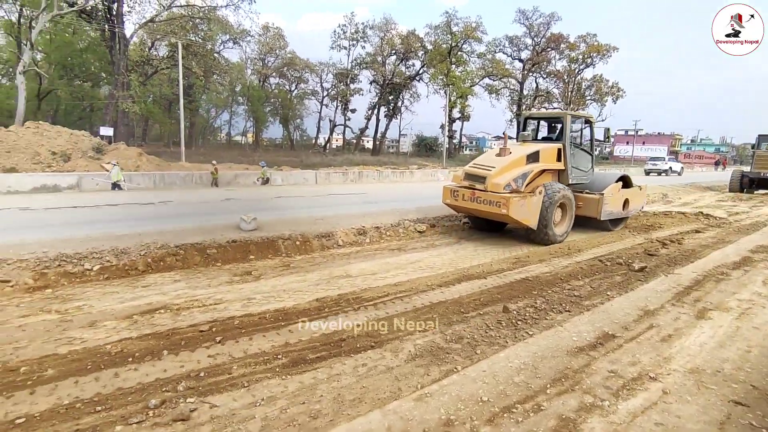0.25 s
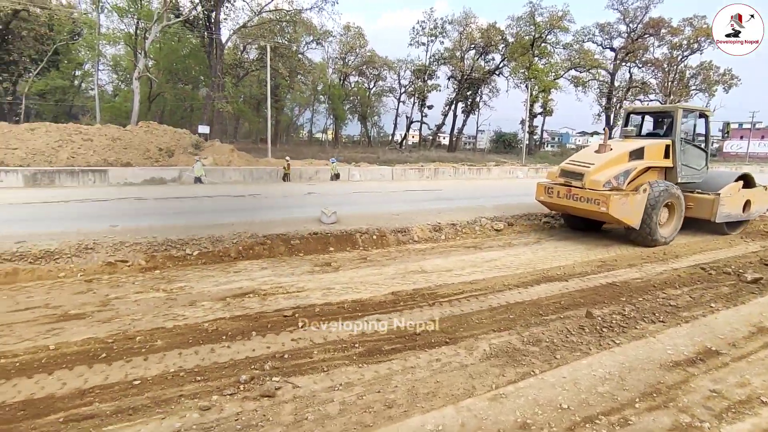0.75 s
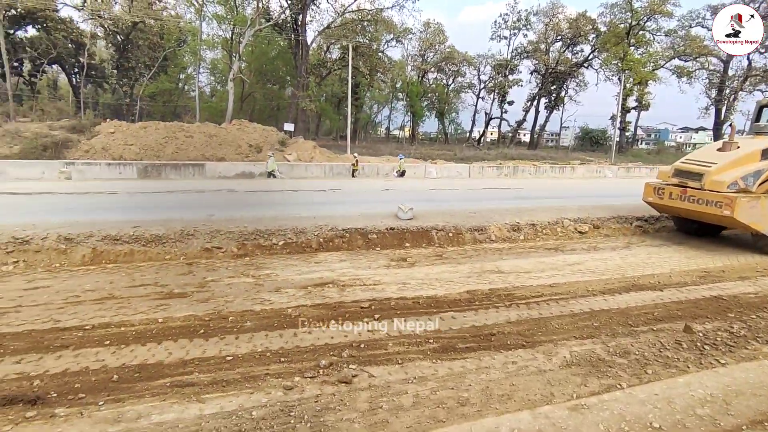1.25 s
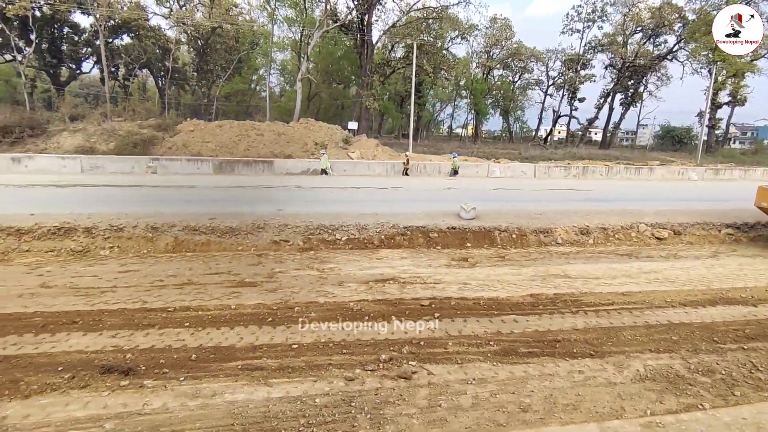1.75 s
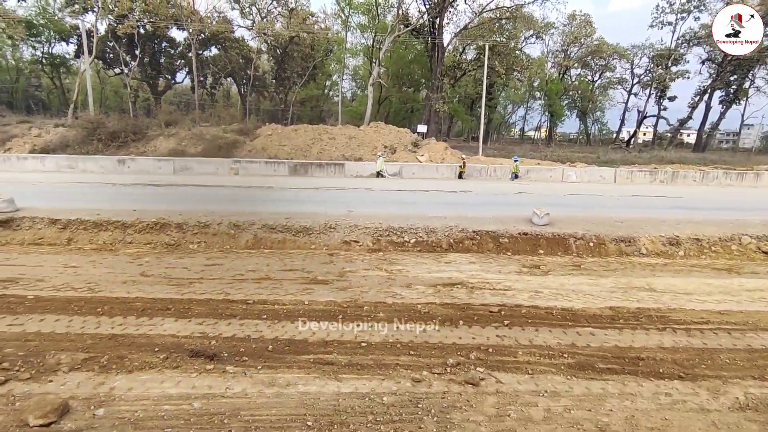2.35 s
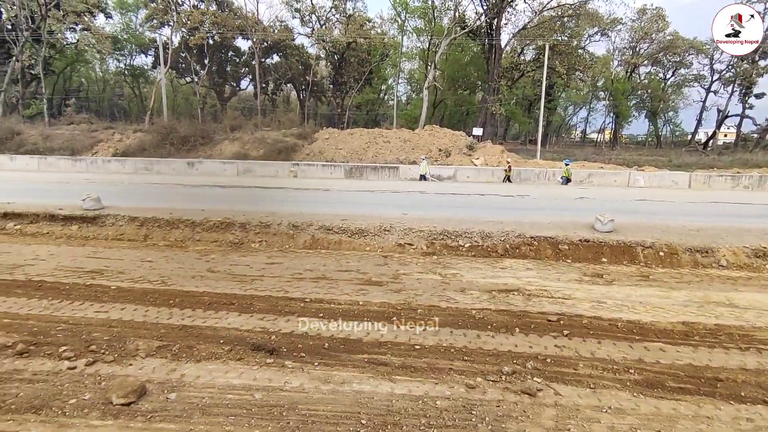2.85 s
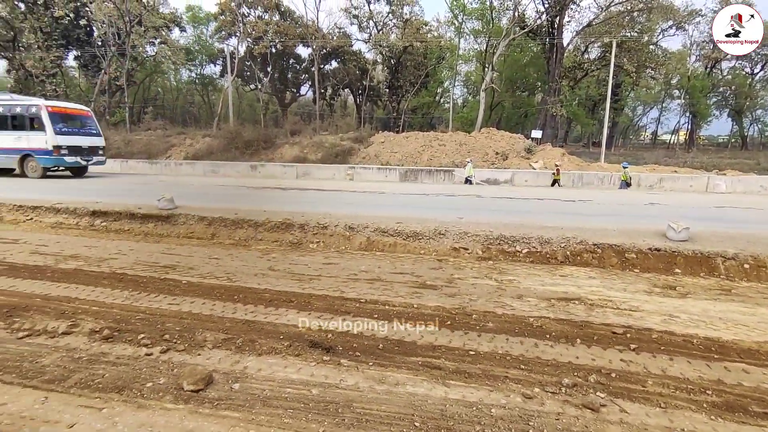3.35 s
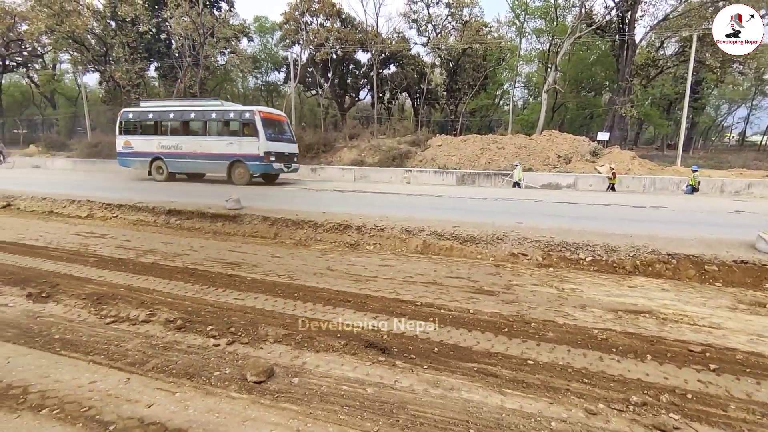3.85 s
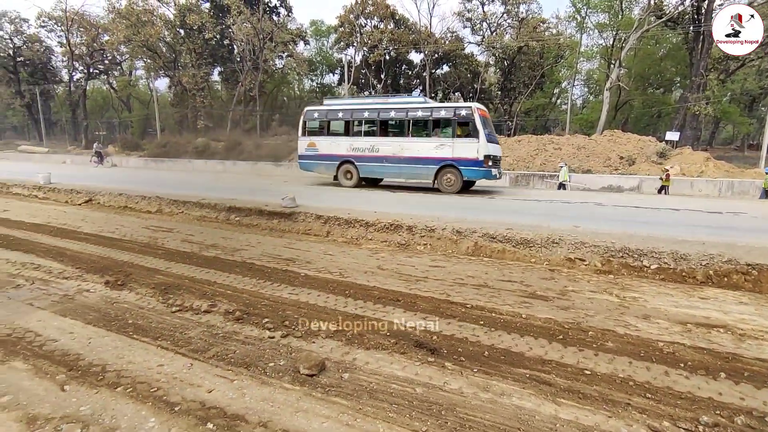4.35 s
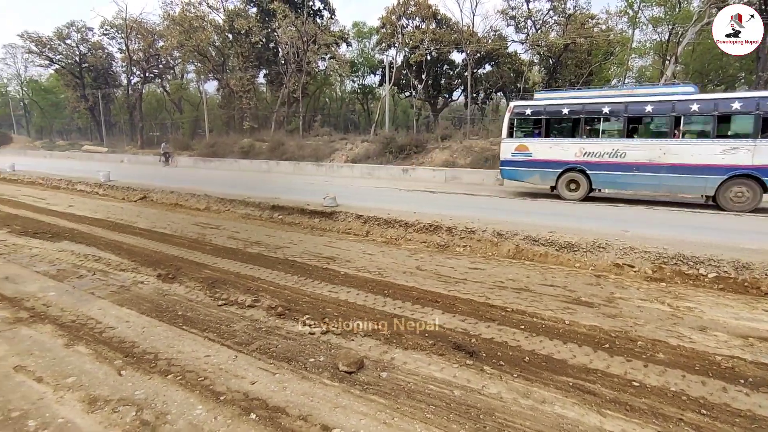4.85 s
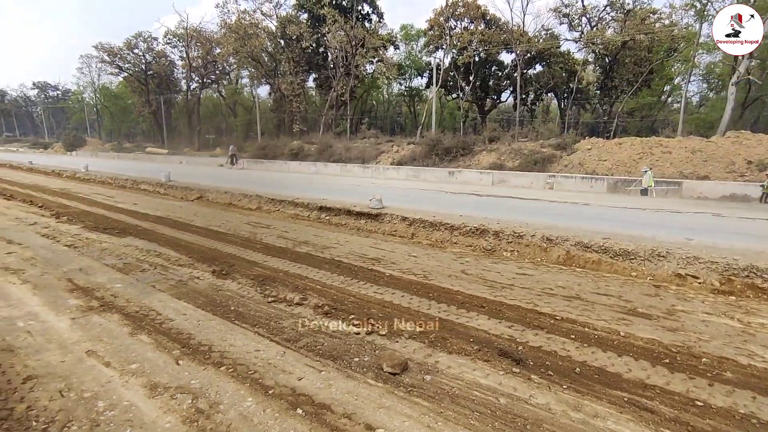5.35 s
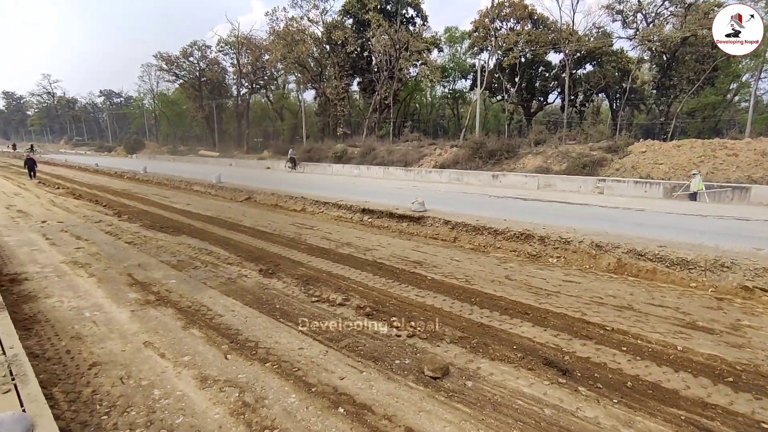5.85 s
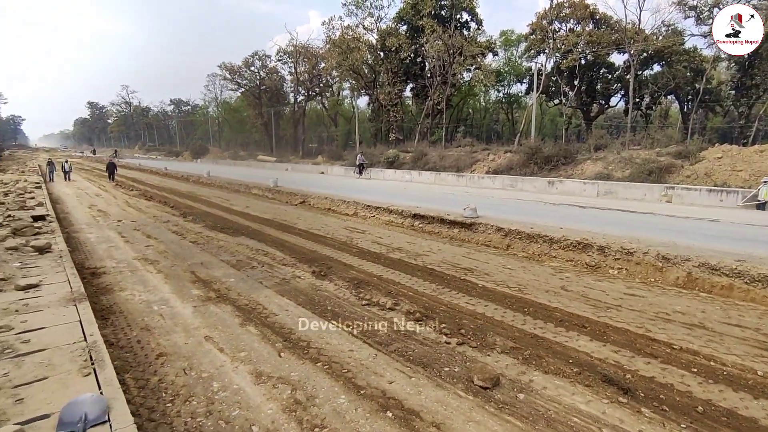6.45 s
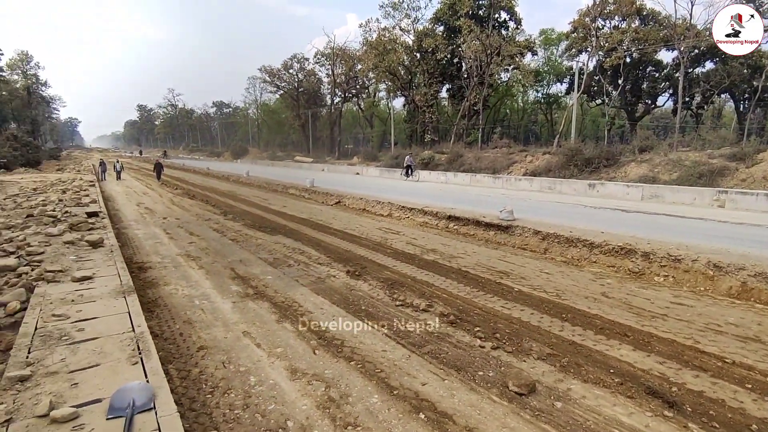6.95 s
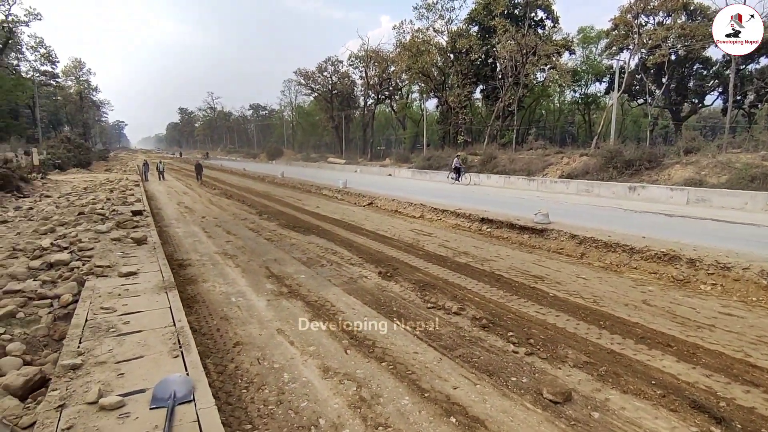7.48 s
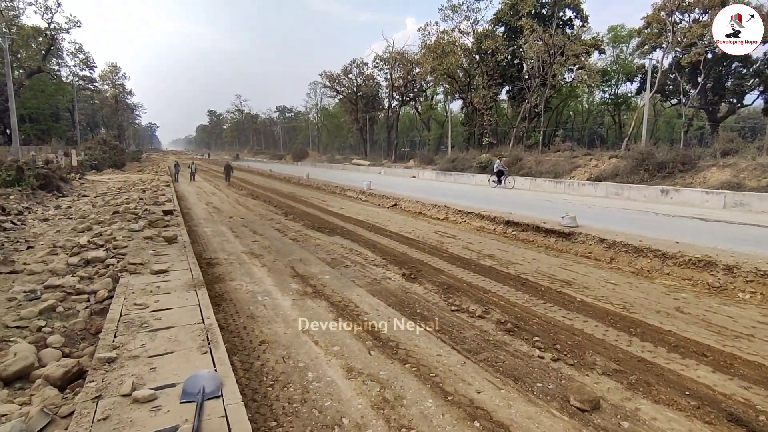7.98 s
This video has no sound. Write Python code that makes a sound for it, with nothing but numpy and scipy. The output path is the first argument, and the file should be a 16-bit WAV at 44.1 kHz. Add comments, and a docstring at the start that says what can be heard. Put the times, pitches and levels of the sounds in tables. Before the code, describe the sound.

A diesel road roller drones and fades, then a bus passes with a swelling exhaust boom over low roadside rumble.

```python
"""A six-cylinder diesel road roller works a gravel bed: exhaust note, pump whine, fan roar, clatter, hiss.
Its eccentric drum shakes the ground until switched off. A bus passes with a swelling exhaust boom
and tyre rush, over a low roadside rumble and far traffic. The microphone pans away from the roller;
its two ports are summed, so notches sweep through roller and bus as their bearings change."""
import sys
import numpy as np
from scipy.fft import rfft, irfft, next_fast_len
from scipy.io import wavfile
from scipy.ndimage import map_coordinates

SR = 44100
rng = np.random.default_rng(int(sys.argv[2]) if len(sys.argv) > 2 else 0)


def store_pcm(level_fs):
    """Save levels as 16-bit WAV."""
    pcm = np.round(np.clip(level_fs, -1, 1) * 32767).astype(np.int16)
    wavfile.write(sys.argv[1], SR, np.atleast_2d(pcm).T)


N = 362502

PORT_MS = 0.494  # lag between the ports, sound from the side


def amp(db):
    """Decibels to gain."""
    return 10 ** (np.asarray(db) / 20)


def unit(x):
    """x scaled to rms 1."""
    return x / np.sqrt(np.mean(x ** 2) + 1e-20)


def curves(rows):
    """One value per sample for each column after the time."""
    s, *cols = np.transpose(rows)
    return [np.interp(np.arange(N) / SR, s, c) for c in cols]


def wobble(rate):
    """A smooth random curve, rate knots a second."""
    return map_coordinates(rng.standard_normal(int(N * rate / SR) + 4), [np.arange(N) * rate / SR])


def filtered(x, response):
    """x times a response of frequency."""
    m = next_fast_len(N + SR // 2)
    return irfft(rfft(x, m) * response(np.fft.rfftfreq(m, 1 / SR)), m)[:N]


def coloured(x, spectrum):
    """x shaped by (Hz, dB) points on a log axis, at rms 1."""
    f, db = np.transpose(spectrum)
    return unit(filtered(x, lambda hz: amp(np.interp(np.log(hz + 1), np.log(f), db))))


def noise(spectrum):
    """Coloured noise of rms 1."""
    return coloured(rng.standard_normal(N), spectrum)


def tone(turns, waver_db, drift):
    """A line of rms 1 whose level and phase waver in the moving air."""
    phase = 2 * np.pi * (turns + rng.random()) + drift * wobble(5.5)
    return unit(amp(waver_db * wobble(6.6)) * np.sin(phase))


def ports(x, lag_ms, far_share, shadow_hz=10000):
    """Sum of the two ports: the far one hears x later, its treble shadowed by the camera body."""
    shadowed = filtered(x, lambda hz: far_share / (1 + (hz / shadow_hz) ** 2))
    return (x + delayed(shadowed, lag_ms)) / np.sqrt(1 + far_share ** 2)


def delayed(x, lag_ms):
    """x arriving lag_ms later."""
    return map_coordinates(x, [np.arange(N) - np.abs(lag_ms) * SR / 1000], order=3, mode="mirror")


def seconds():
    """The time of every sample."""
    return np.arange(N) / SR


def step(x, middle, edge):
    """A soft step from 0 to 1 as x passes middle."""
    return .5 + .5 * np.tanh((x - middle) / (2 * edge))


def band(centre_hz, width_hz):
    """Narrow noise of rms 1 around a steady or moving centre."""
    phase = 2 * np.pi * np.cumsum(np.full(N, centre_hz)) / SR
    return unit(wobble(width_hz) * np.cos(phase) + wobble(width_hz) * np.sin(phase))


def swell(peak_s, hold_s, db, rise_db_per_s, fall_db_per_s):
    """Gain that rises until peak_s and falls from peak_s + hold_s."""
    t = seconds() - peak_s
    return amp(db - rise_db_per_s * np.maximum(-t, 0) - fall_db_per_s * np.maximum(t - hold_s, 0))


def gush(peak_s, hold_s, db, rise_db_per_s, fall_db_per_s, centre_hz, glide_hz_per_s, width_hz):
    """Swell of narrow noise, gliding in pitch around its peak."""
    hz = centre_hz + glide_hz_per_s * np.clip(seconds() - peak_s, -.5, 1)
    return swell(peak_s, hold_s, db, rise_db_per_s, fall_db_per_s) * band(hz, width_hz)


def exhaust_and_pump(cycles, trim_db=-4):
    """Exhaust harmonics of the four-stroke cycle and steady hydraulic whine, on one envelope."""
    # t/s, level/dB before trim
    exhaust_envelope = [(0, -23.5), (1.4, -22), (3.6, -22.5), (4.8, -32.5), (8.22, -34.5)]
    # multiple of cycle rate, relative level/dB
    exhaust_lines = [(6, 3.5), (12, -7), (18, -13), (40, -17), (46, -19), (47, -17.5)]
    # f/Hz, relative level/dB
    pump_lines = [(261.5, -4.5), (449.5, -9), (514, -11.5)]
    level_db, = curves(exhaust_envelope)
    exhaust = sum(amp(db) * tone(k * cycles, waver_db=1, drift=0.05) for k, db in exhaust_lines)
    pump = sum(amp(db) * tone(hz * seconds(), waver_db=3.5, drift=0.96) for hz, db in pump_lines)
    return amp(level_db + trim_db) * (exhaust + pump)


def block_tones(cycles):
    """The engine block sounds at high harmonics of the cycle."""
    # multiple of cycle rate, relative level/dB
    block_lines = [(53, -4.5), (54, -9.5), (58, -5), (59, -6.5), (66, -3), (68, -5), (70, -3), (72, -11.5),
                   (78, -8.5), (81, -13)]
    return sum(amp(db) * tone(k * cycles, waver_db=7, drift=0.8) for k, db in block_lines)


def throb(cycles, uneven_db, repeat_share):
    """White engine noise, partly repeating each cycle; the nearer cylinders knock louder."""
    size = int(1 / np.mean(np.gradient(cycles)))
    repeating = map_coordinates(rng.standard_normal(size), [cycles % 1 * size], order=1, mode="grid-wrap")
    rattle = np.sqrt(repeat_share) * unit(repeating) + np.sqrt(1 - repeat_share) * rng.standard_normal(N)
    return rattle * amp(uneven_db * np.cos(2 * np.pi * cycles))


def fan_roar(cycles):
    """Low fan noise with a flickering level."""
    # f/Hz, relative level/dB
    roar_spectrum = [(40, -52.5), (60, -7.5), (120, -8), (190, -7), (260, 0.5), (330, 0.5), (400, -1),
                     (510, -0.5), (570, -9), (720, -19), (1100, -46), (3000, -80)]
    flicker = amp(0.61 * wobble(14) + 1.4 * wobble(36))
    return flicker * coloured(throb(cycles, uneven_db=0.3, repeat_share=0.059), roar_spectrum)


def puffs(firings):
    """One pressure pulse per firing: most are weak, a few thump."""
    # f/Hz, relative level/dB
    puff_spectrum = [(60, -33.5), (110, -21), (170, -4.5), (270, 0.5), (400, -2.5), (470, -4), (560, -17),
                     (1000, -43.5)]
    fired = np.diff(np.floor(firings), prepend=0)
    return coloured(-fired * rng.random(N) ** 3, puff_spectrum)


def clatter(cycles, buzz_db=1.5):
    """Block clatter, buzzing at seven beats a cycle."""
    # f/Hz, relative level/dB
    clatter_spectrum = [(400, -42.5), (580, -5.5), (720, -3), (960, -4), (1200, -5.5), (1450, -11),
                        (1800, -12.5), (4000, -61.5)]
    buzz = amp(buzz_db * np.cos(2 * np.pi * 7 * cycles))
    return coloured(buzz * throb(cycles, uneven_db=0.5, repeat_share=0.25), clatter_spectrum)


def injector_rasp(cycles):
    """Bright injector noise, pulsing slightly once a cycle."""
    # f/Hz, relative level/dB
    rasp_spectrum = [(700, -25.5), (1100, -9), (1370, 4.5), (1700, 0.5), (2350, -1.5), (2750, -3.5),
                     (3400, -13), (5000, -22), (7500, -44.5)]
    return amp(0.4 * np.cos(2 * np.pi * cycles)) * noise(rasp_spectrum)


def bounced(x):
    """Direct sound plus a reflection off packed soil that fades as the roller comes close."""
    # t/s, lag/ms, reflection gain
    reflection = [(0, 0.93, 0.54), (0.55, 0.94, 0.47), (1.1, 1.02, 0.29), (1.7, 0.83, 0)]
    lag_ms, strength = curves(reflection)
    return (x + strength * delayed(x, lag_ms)) / np.sqrt(1 + strength ** 2)


def from_roller(x, bearing_deg):
    """x at the summed ports, from a bearing on the roller."""
    return ports(x, PORT_MS * np.sin(np.radians(bearing_deg)), far_share=0.6, shadow_hz=8500)


def hiss(bearing_deg):
    """Hiss from the roller's front, middle and rear; a wide span blurs their notches."""
    # f/Hz, relative level/dB
    hiss_spectrum = [(1500, -18.5), (2600, -3), (3400, 3), (4400, -0.5), (5200, 3.5), (6000, 0), (6700, 2),
                     (7400, 6.5), (8000, -22)]
    # t/s, half span/deg
    half_span = [(0, 3.2), (1.5, 8.4), (4, 4.6), (8.22, 0.98)]
    half_deg, = curves(half_span)
    parts = (from_roller(noise(hiss_spectrum), bearing_deg + side * half_deg) for side in (-1, 0, 1))
    return sum(parts) / np.sqrt(3)


def sizzle():
    """A narrow band of hiss stands out twice and slides in pitch."""
    # peak/s, hold/s, level/dB, rise/(dB/s), fall/(dB/s), f/Hz, glide/(Hz/s)
    sizzles = [(1.1, 0.4, -43, 23.5, 18.5, 6210, -700), (2.3, 0.27, -48.5, 16, 17, 6310, 601.5)]
    return sum(gush(*row, width_hz=750) for row in sizzles)


def roller():
    """The diesel's parts summed; levels and port lag shift as the microphone turns away."""
    # t/s, firing rate/Hz
    engine_speed = [(0, 102.7), (1, 102.7), (2.5, 102.8), (8.2, 102.1)]
    # t/s, bearing off axis/deg
    roller_bearing = [(0, 13.5), (.45, 20.6), (1.1, 38.5), (1.8, 55), (2.5, 68), (4.2, 95), (5.4, 113),
                      (6.2, 113), (7, 128), (8.22, 131)]
    firing_hz, = curves(engine_speed)
    bearing_deg, = curves(roller_bearing)
    turned = (1 - np.cos(np.radians(bearing_deg))) / 2  # 0 ahead, 1 behind
    screened = step(bearing_deg, 117.2, 0.87)  # engine bay screened behind the microphone
    roar_db = -18.5 - 13 * turned
    hood_db = -27 - 23 * turned
    clatter_db = -29.5 - 3.5 * turned - 16 * screened
    rasp_db = -34.5 - 7.5 * turned - 17.5 * screened
    firings = np.cumsum(firing_hz * (1 + 0.00083 * wobble(3.04))) / SR
    cycles = firings / 6
    lines = exhaust_and_pump(cycles)
    block = amp(-12) * block_tones(cycles)
    roar = amp(roar_db) * (fan_roar(cycles) + amp(-6) * puffs(firings))
    hood_resonance = amp(hood_db) * band(centre_hz=393, width_hz=42)
    knocking = amp(clatter_db) * (clatter(cycles) + block)
    flutter = amp(0.7 * wobble(16))  # moving air
    treble_gain = flutter * amp(2.5 * (1 - step(seconds(), 0.41, 0.025)))  # brighter at first
    rasp = amp(rasp_db) * treble_gain * injector_rasp(cycles)
    body = lines + hood_resonance + bounced(roar + knocking + rasp)
    hiss_db = -38.5 - 7.5 * turned + .25 * np.cos(2 * np.pi * firings)
    hissing = amp(hiss_db) * treble_gain * hiss(bearing_deg)
    return from_roller(body, bearing_deg) + hissing + flutter * sizzle()


def drum(spin_hz=30.43, stop_s=4.1, fall_db_per_s=55.5):
    """An eccentric weight shakes the ground at its spin rate and twice that, until switched off."""
    level_db = -37 - fall_db_per_s * np.maximum(seconds() - stop_s, 0)
    spin = spin_hz * seconds()
    shake = tone(spin, waver_db=1, drift=.08) + amp(-1) * tone(2 * spin, waver_db=2, drift=.4)
    return amp(level_db) * shake


def rumble():
    """Lumpy low roadside noise."""
    # t/s, level/dB
    rumble_envelope = [(0, -26), (1, -20.5), (3.5, -20.5), (4.5, -19), (6.3, -18.5), (7, -17.5),
                       (8.22, -19)]
    # f/Hz, relative level/dB
    rumble_spectrum = [(15, -58.5), (35, -38), (55, -9), (80, -5), (108, 0.5), (135, -2), (185, 1),
                       (245, -2.5), (295, -11.5), (400, -18), (700, -23.5), (2000, -56)]
    level_db, = curves(rumble_envelope)
    return amp(level_db) * unit(amp(0.36 * wobble(25)) * noise(rumble_spectrum))


def far_traffic(turn_s=6.1):
    """Distant traffic, louder once the microphone faces up the road."""
    # f/Hz, relative level/dB
    traffic_spectrum = [(200, -13.5), (450, -6), (800, -4.5), (1020, -16.5), (1250, -10), (1650, -13.5),
                        (2150, -21.5), (2600, -19), (3300, -25.5), (4200, -35.5), (5200, -21), (6500, -38),
                        (7500, -34.5)]
    level_db = -41.5 + 9 * step(seconds(), turn_s, 0.33)
    return amp(level_db + 0.51 * wobble(10)) * noise(traffic_spectrum)


def bus_exhaust(firings):
    """Low gushes, and a boom that peaks when the tailpipe faces the microphone."""
    # peak/s, hold/s, level/dB, rise/(dB/s), fall/(dB/s)
    boom_swell = (5, -0.07, -17, 6, 13.5)
    # peak/s, hold/s, level/dB, rise/(dB/s), fall/(dB/s), f/Hz, glide/(Hz/s)
    gushes = [(3.192, 0.2, -27, 6.5, 4, 171.8, 0.5), (5.519, 0.5, -20, 28, 51.5, 177.5, 115)]
    boom = swell(*boom_swell) * tone(firings, waver_db=.7, drift=.08)
    return boom + sum(gush(*row, width_hz=80) for row in gushes)


def bus_resonances():
    """Tyre tread and engine resonances swell as the bus approaches."""
    # peak/s, hold/s, level/dB, rise/(dB/s), fall/(dB/s), f/Hz, glide/(Hz/s)
    resonances = [(3.85, 0.4, -35.5, 19.5, 15, 820, 0), (3.35, 0.35, -38, 8.5, 24.5, 1400, 60)]
    return sum(gush(*row, width_hz=190) for row in resonances)


def bus(pass_s=4.5, speed_m_per_s=12, distance_m=14, ground_db_per_m=0.04, firing_hz=58.9):
    """Straight drive-past; engine and gears radiate forwards, then the body shields them."""
    # f/Hz, relative level/dB
    tyre_spectrum = [(40, -28.5), (65, -2), (250, -4), (360, -1), (500, 3.5), (680, -0.5), (920, -5.5),
                     (1150, -9.5), (1600, -22.5), (2250, -21.5), (2900, -27), (4200, -30), (7500, -46)]
    # f/Hz, relative level/dB
    engine_spectrum = [(500, -26), (750, 0), (920, 7.5), (1150, -14), (1400, 0), (1900, -1.5), (2250, -1),
                       (2750, -17), (3400, -19.5), (4200, -14), (5200, -35.5), (6500, -32), (7500, -15)]
    # t/s, bearing/deg
    bus_bearing = [(2, -63.5), (3.25, -48.5), (4.25, -7), (4.6, 23), (5, 41.5), (5.4, 64.5), (6, 98),
                   (8.22, 139)]
    along_m = speed_m_per_s * (seconds() - pass_s)
    range_m = np.hypot(along_m, distance_m)
    receding = along_m / range_m
    near_db = -20 * np.log10(range_m / distance_m) - ground_db_per_m * (range_m - distance_m)
    front_db = near_db - receding - 5.5 * step(seconds(), 4.6, 0.037)
    firings = firing_hz * seconds()
    exhaust = bus_exhaust(firings)
    gear_hz = 504 / (1 + receding * speed_m_per_s / 343)  # Doppler
    gears = amp(-32.5 + front_db) * tone(np.cumsum(gear_hz) / SR, waver_db=4, drift=0.87)
    tyres = amp(-25 + near_db + 0.25 * wobble(4.9)) * noise(tyre_spectrum)
    throb_db = 0.52 * np.cos(2 * np.pi * firings) + 1.3 * wobble(10)
    engine = amp(-31.5 + front_db + throb_db) * noise(engine_spectrum)
    bearing_deg, = curves(bus_bearing)
    lag_ms = PORT_MS * np.sin(np.radians(bearing_deg))
    return exhaust + bus_resonances() + ports(tyres + engine + gears, lag_ms, far_share=0.34)


def far_engine():
    """An engine drones up the road near the end."""
    gain = swell(peak_s=7, hold_s=1, db=-25.5, rise_db_per_s=9, fall_db_per_s=10.5)
    return gain * band(centre_hz=226.4, width_hz=62)


def scene():
    """All sources at the microphone, mono."""
    return (roller() + drum() + bus() + far_engine() + rumble() + far_traffic())[None]


def record(dry):
    """The microphone softens one treble band and passes nothing above its band limit."""
    low_hz, high_hz, soft_db, top_hz = 3560, 5860, -5.5, 7620
    return filtered(dry[0], lambda f: amp(soft_db * ((f > low_hz) & (f < high_hz))) * (f < top_hz))[None]


dry = scene()
out = record(dry)
store_pcm(out)
```